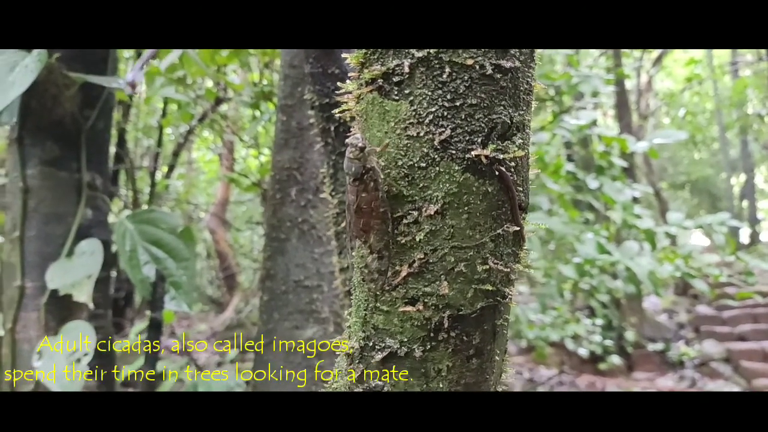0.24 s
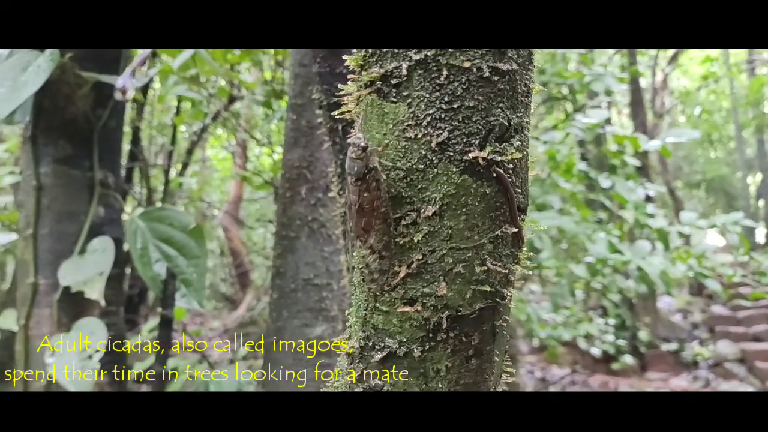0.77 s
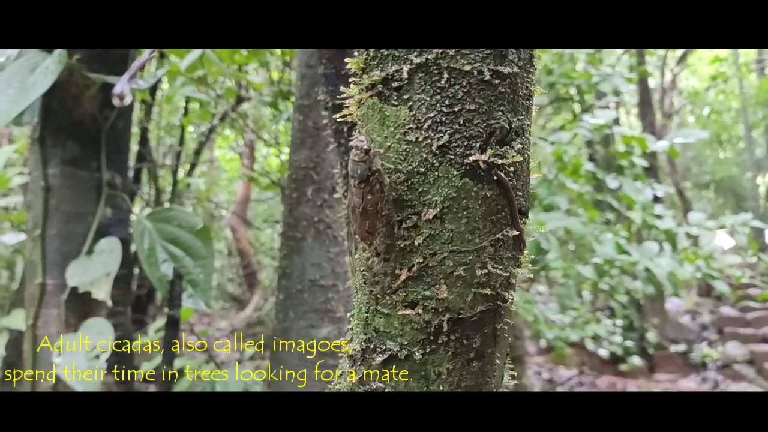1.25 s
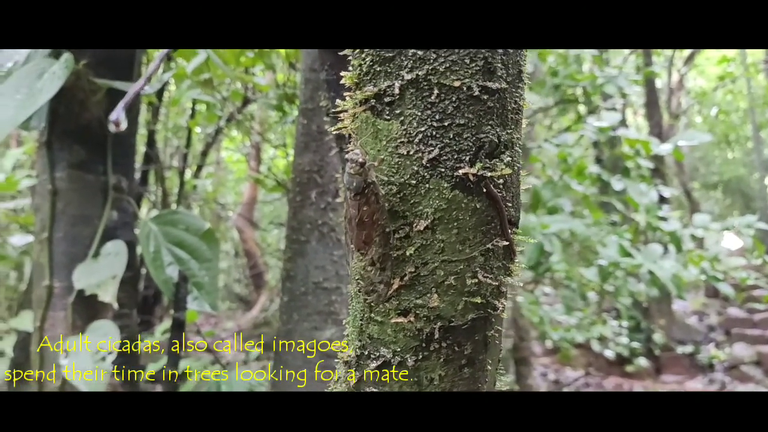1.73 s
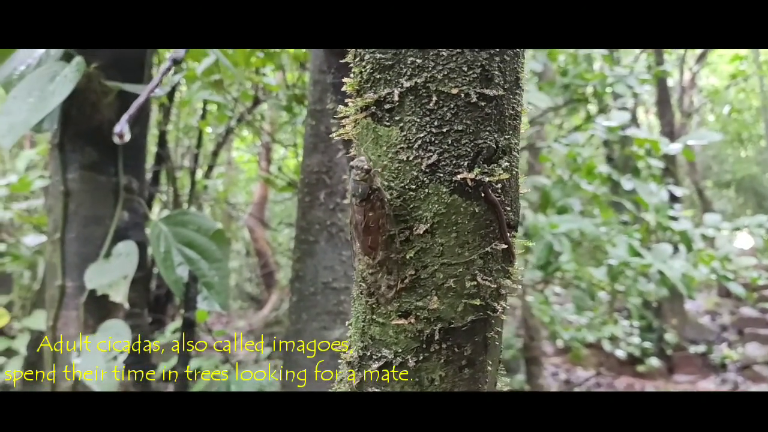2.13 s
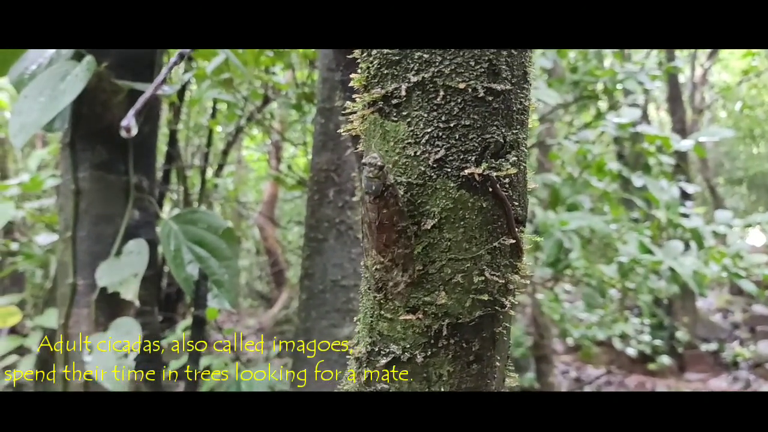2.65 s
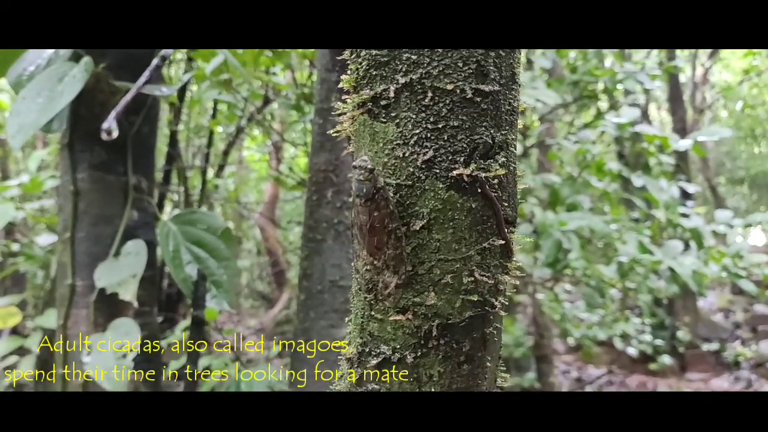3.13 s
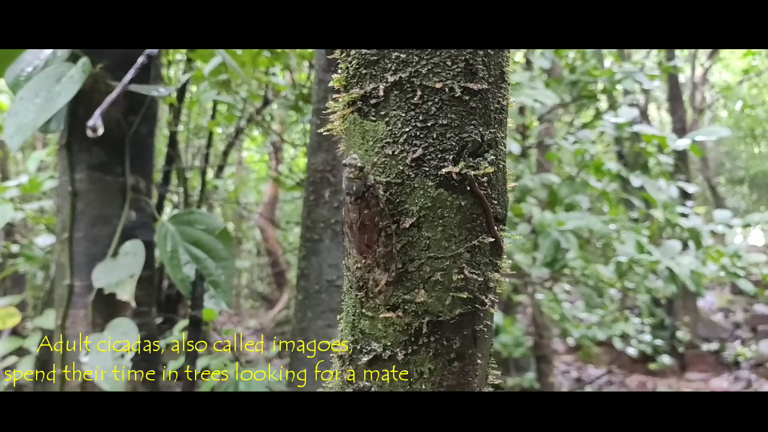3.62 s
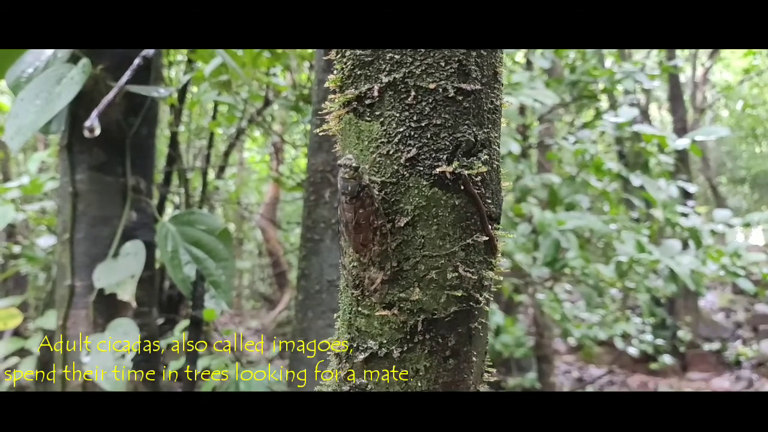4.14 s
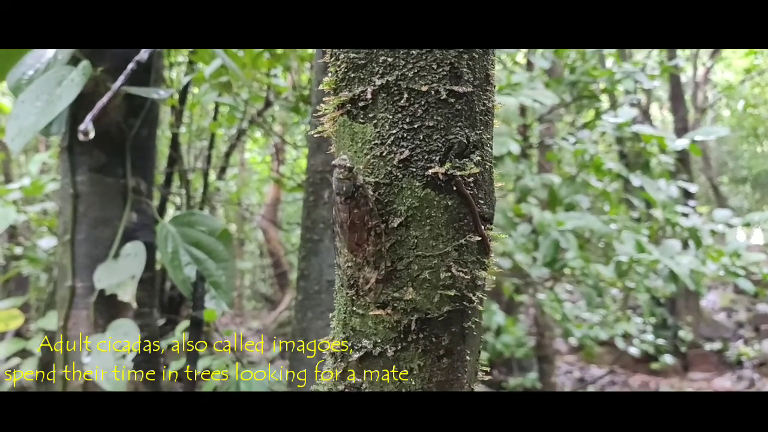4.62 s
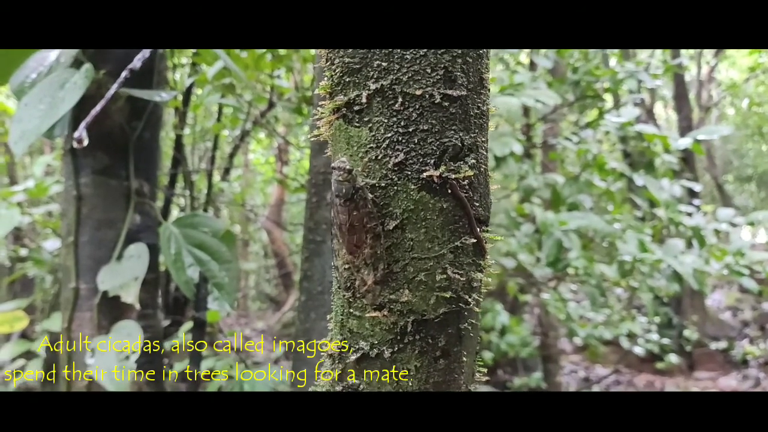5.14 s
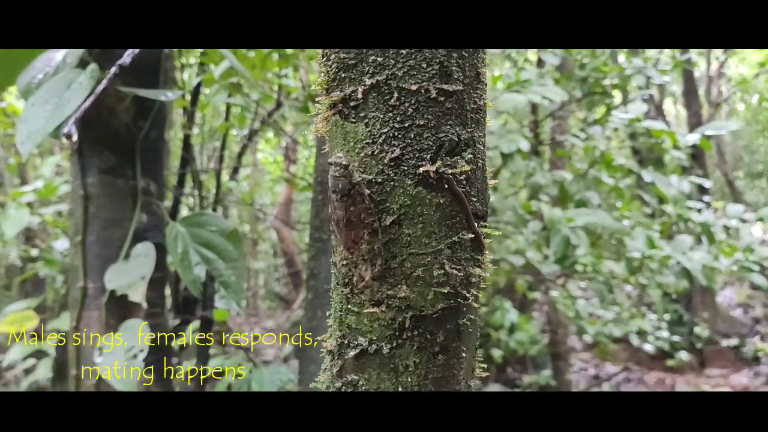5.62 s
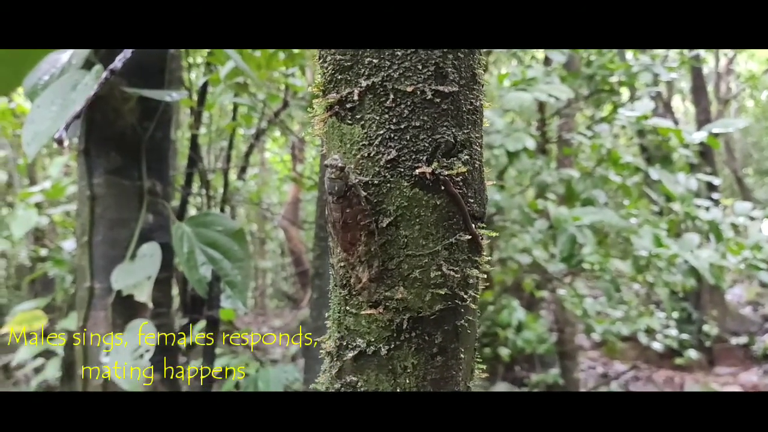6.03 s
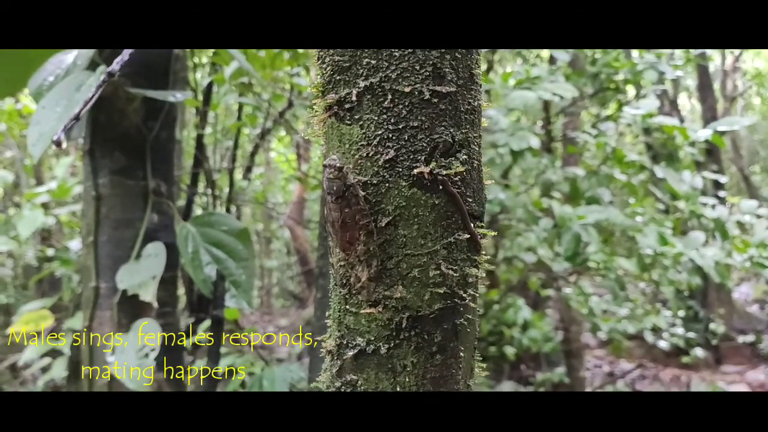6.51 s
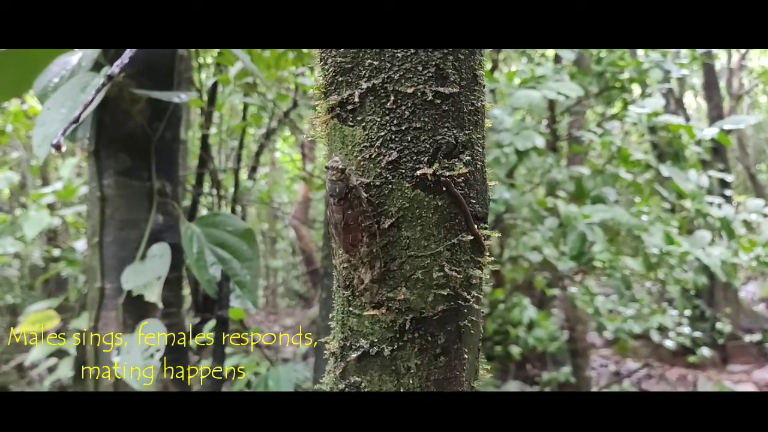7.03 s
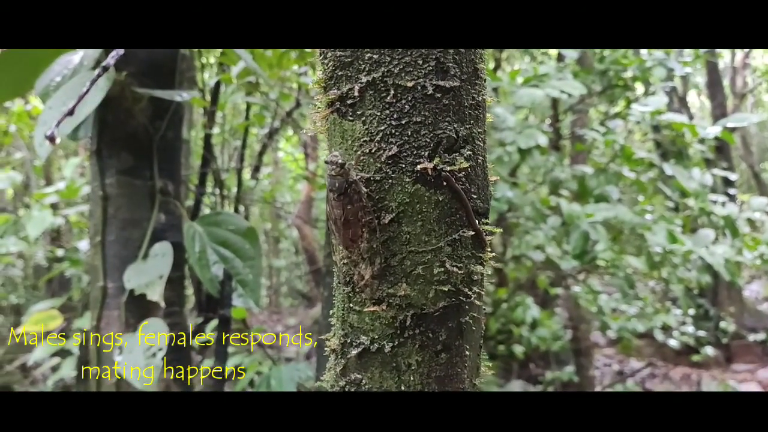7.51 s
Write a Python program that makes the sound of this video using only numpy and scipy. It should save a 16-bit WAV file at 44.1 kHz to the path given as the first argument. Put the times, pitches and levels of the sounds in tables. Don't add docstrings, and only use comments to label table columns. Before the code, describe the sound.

A single cicada close by rasps quick, dry chirps that build to a loud buzzing swell, then sag into a drone, about once a second.

```python
import sys
import numpy as np
from scipy import signal
from scipy.fft import irfft
from scipy.io import wavfile
from scipy.ndimage import uniform_filter1d

SR = 44100
rng = np.random.default_rng(int(sys.argv[2]) if len(sys.argv) > 2 else 0)


def to_wav(s):
    ch = np.atleast_2d(s).T
    pcm = np.round(np.clip(ch, -1, 1) * 32767)
    wavfile.write(sys.argv[1], SR, pcm.astype(np.int16))


def nominal_scale(level):
    x = np.asarray(level, float) / 20
    return 10 ** x


N = 342657

# (start [s], end [s])
ONE_SIDED = [(.745, 1.01), (1.71, 1.96), (2.6, 2.89), (3.62, 3.89), (4.58, 4.85), (5.57, 5.81),
             (6.59, 6.83), (7.49, 7.68)]
# (peak of effort [s], peak re usual [dB], abdomen flips down [s],
# lift of the air sac pitch [ratio], rattle re usual [dB])
SONG_PHRASES = [(0.686, -1.5, 0.695, 1.01, -1), (1.625, 0.5, 1.65, 0.93, -1),
                (2.551, 0.5, 2.56, 1.04, -1.5), (3.54, -2, 3.52, 0.9, -0.5), (4.504, -4, 4.485, 0.68, 1),
                (5.485, 0.5, 5.465, 0.76, 1), (6.505, 1, 6.485, 0.72, 1.5), (7.4, -6, 7.388, 0.6, 2.5),
                (8.3, 0, 8.28, 1, 4)]
# (frequency [Hz], level [dB])
MICROPHONE_EDGE = [(15650, 0), (15900, -24), (16700, -42), (17000, -90)]


def evened(x):
    return x / np.sqrt(np.mean(x ** 2) + 1e-20)


def read(points, hz):
    f, value = np.transpose(points)
    return np.interp(np.log(hz + 1), np.log(f + 1), value)


def ring(x, hz, width):
    turn = np.exp(2j * np.pi * np.cumsum(hz * np.ones(len(x))) / SR)
    r = np.exp(-np.pi * width / SR)
    return np.sqrt(2 * (1 - r * r)) * (turn * signal.lfilter([1], [1, -r], x / turn)).imag


def steep(x, hz, width):
    return ring(ring(x, hz, width), hz, 3 * width) * np.sqrt(6 * np.pi * width / SR)


def colour(x, points):
    log_gain = np.log(nominal_scale(read(points, abs(np.fft.fftfreq(4096, 1 / SR)))))
    taps = np.fft.ifft(np.exp(np.conj(signal.hilbert(log_gain)))).real[:1024]
    return signal.oaconvolve(x, taps)[:N]


def forest():
    # (frequency [Hz], density [dB per Hz])
    forest_spectrum = [(20, 13.5), (45, 0.5), (100, -2.5), (250, -9), (500, -14.5), (1200, -21),
                       (2600, -19.5), (3800, -20.5), (5000, -22.5), (6600, -29), (8000, -22.5),
                       (12000, -29), (16000, -43)]
    # (frequency [Hz], left-right likeness [0-1])
    likeness = [(30, 0.89), (150, 1), (300, 0.82), (700, 0.49), (3000, 0.021)]
    frames, hz = N // 256 + 5, np.fft.rfftfreq(1024, 1 / SR)
    a, b, c, d, patches = rng.standard_normal((frames, 513, 5)).T
    patches = uniform_filter1d(patches, size=10, axis=0)
    patches = evened(uniform_filter1d(patches, size=12, axis=1))
    same = np.clip(read(likeness, hz), -1, 1)[:, None]
    left = a + 1j * b
    z = np.array([left, same * left + np.sqrt(1 - same ** 2) * (c + 1j * d)])
    z *= nominal_scale((read(forest_spectrum, hz) + read(MICROPHONE_EDGE, hz))[:, None] + 1.6 * patches)
    return nominal_scale(-51) * evened(signal.istft(z, nperseg=1024, noverlap=768)[1][:, :N])


def far_insects():
    throb = 1 + 0.19 * np.sin(2 * np.pi * 31 * np.arange(N) / SR)
    whistle = [evened(ring(ring(rng.standard_normal(N), 5800, 550), 5800, 550)) for _ in range(2)]
    return nominal_scale(np.array([[-64], [-69]])) * throb * whistle


def leaves(x, t60, start_ms):
    t = np.arange(8000) / SR
    taps = rng.choice([-1., 1.], (2, len(t))) * (rng.random((2, len(t))) < .08)
    taps *= nominal_scale(-60 * t / t60) * (t > start_ms / 1000)
    return signal.oaconvolve(x, taps / np.linalg.norm(taps, axis=1, keepdims=True), axes=1)[:, :N]


def ports(x):
    # (frequency [Hz], left minus right [dB])
    shading = [(700, 3), (1300, 0), (1700, -3.5), (2150, -6.5), (2600, 1.5), (3400, -3), (4300, 0.5),
               (5000, 4), (5500, 10.5), (6000, 15), (6600, -4.5), (9000, 2), (9700, -0.5), (13500, 0)]
    # (frequency [Hz], phase by which the left leads [rad])
    left_lead = [(100, 0), (800, -1.7), (1500, -1), (2200, -.3), (2900, -1.3), (4100, -1.2), (5200, -2.4),
                 (6100, -4.3), (7500, -4.2), (9000, -6), (12000, -8), (16000, -10.5)]
    hz = np.fft.rfftfreq(1024, 1 / SR)
    lead = np.exp(1j * np.interp(hz, *np.transpose(left_lead)))
    shade = nominal_scale(read(shading, hz))
    right = np.sqrt(2 / (1 + shade ** 2)) * nominal_scale(read(MICROPHONE_EDGE, hz))
    taps = np.roll(irfft(np.array([shade * right * lead, right])), 512, axis=1) * np.hanning(1024)
    return signal.oaconvolve(x, taps, axes=1)[:, 512:512 + N]


def bursts():
    # (first chirp [s], last chirp [s], chirp length [s], extra effort [dB])
    chirp_runs = [(.004, .055, 0.016, -4), (0.226, .341, 0.02, 1), (0.403, .517, 0.024, 0.5),
                  (1.037, 1.037, 0.018, -3.4), (1.189, 1.465, 0.022, 0.15), (1.989, 2.04, 0.025, -2.5),
                  (2.1, 2.27, .023, -0.8), (2.328, 2.384, 0.03, -0.5), (2.909, 3.001, 0.019, -3),
                  (3.062, 3.123, 0.024, -1.5), (3.175, 3.283, 0.023, 0.4), (3.34, 3.395, 0.027, 0.5),
                  (3.912, 4.081, 0.019, -2), (4.146, 4.2, 0.019, 0), (4.258, 4.369, 0.025, -1),
                  (4.879, 4.934, 0.021, -1), (4.993, 5.231, .026, 0.5), (5.289, 5.289, 0.021, 2.3),
                  (5.344, 5.345, 0.024, 3.2), (5.844, 5.898, 0.022, -2), (5.937, 5.938, 0.038, -2),
                  (6.011, 6.188, 0.025, 0), (6.242, 6.351, 0.025, 0.6), (6.867, 7.272, 0.024, -0.5),
                  (7.698, 7.753, 0.024, -0.3)]
    # (first click [s], last click [s], extra effort [dB])
    swells = [(0.104, 0.191, -2), (.568, 0.608, 1.3), (0.626, 0.723, 0.9), (1.088, 1.158, -4),
              (1.517, 1.557, -1), (1.569, 1.628, -2), (1.653, 1.689, -0.5), (2.442, 2.477, -0.1),
              (2.492, 2.564, -1.2), (3.45, 3.604, 0.9), (4.427, 4.475, -2), (4.494, 4.654, -3),
              (5.398, 5.548, 0.36), (6.406, 6.449, -.2), (6.464, 6.573, -1.5), (7.326, 7.374, -2),
              (7.394, 7.473, 1)]
    # (first click [s], last click [s], extra effort [dB])
    drones = [(.748, .846, -6), (0.87, .997, -5), (1.712, 1.822, -3.6), (1.826, 1.941, -3.5),
              (2.575, 2.707, -5), (2.738, 2.879, -4), (3.624, 3.676, -2.7), (3.699, 3.873, -3),
              (4.675, 4.708, -3.5), (4.722, 4.833, -1.5), (5.574, 5.804, -2), (6.591, 6.732, -0.5),
              (6.737, 6.824, -1.5), (7.496, 7.665, -0.5)]
    short = []
    for first, last, length, db in chirp_runs:
        count = round((last - first) / .056) + 1
        short += [(s, s + length, db) for s in np.linspace(first, last, count)]
    return short + swells + drones


def effort(t):
    # (time from peak [s], effort [dB])
    effort_shape = [(-.53, -43), (-.15, -41), (-.09, -35), (-.04, -30), (0, -24), (.04, -30), (.09, -36.5),
                    (.18, -44.5), (0.268, -44.5)]
    s, db = np.transpose(effort_shape)
    peak_from_db = -38
    share = np.clip((db - peak_from_db) / (db.max() - peak_from_db), 0, 1)
    rows = []
    for peak, peak_db, *_ in SONG_PHRASES:
        rows += zip(peak + s, db + share * peak_db)
    return np.interp(t, *np.transpose(sorted(rows)))


def posture(t):
    # (time from flip [s], air sac [Hz], tymbal plate [Hz], plate re sac [dB], rattle re sac [dB])
    posture_shape = [(-.52, 2034, 4700, 0, -3.5), (-.31, 2450, 4530, -1.5, -5), (-.12, 2950, 4580, 1, -4.5),
                     (-.035, 2890, 4250, -0.5, 1), (0, 2690, 4770, 3.5, -4.5), (0.036, 2380, 5020, 6, -2.5),
                     (0.102, 2080, 4400, 0.5, -6.5), (.19, 1890, 4774, 3, -3.5),
                     (.27, 1810, 5200, 2.5, -2.5)]
    rest_hz = 2000
    rows = []
    for _, _, flip, lift, more_db in SONG_PHRASES:
        for s, sac_hz, plate_hz, plate_db, rattle_db in posture_shape:
            lifted_hz = rest_hz + lift * (sac_hz - rest_hz)
            rows.append((flip + s, lifted_hz, plate_hz, plate_db, rattle_db + more_db))
    s, *columns = np.transpose(sorted(rows))
    return [np.interp(t, s, c) for c in columns]


def muscles(pair_ms, offset, snap_ms, jitter_ms, spread_db, second_db, lone):
    # (effort [dB], period [ms])
    muscle_pace = [(-44, 11.3), (-39, 10), (-35, 8)]
    inward, outward = np.zeros((2, N + SR))
    work = bursts()
    chance = rng.standard_normal((len(work), 60, 5))
    times = np.arange(0, N / SR + 1, .002)
    effort_db = effort(times)
    for (start, end, extra_db), draws in zip(work, chance):
        s = start
        for draw in draws:
            period = np.interp(np.interp(s, times, effort_db), *np.transpose(muscle_pace)) / 1000
            both = not any(a < s < b for a, b in ONE_SIDED)
            slack = np.clip((period - .008) / .003, 0, 1)
            period += both * slack * pair_ms / 1000
            uneven_db = spread_db * (1.0 + slack * (0.5 + lone * (not both))) * draw[:4]
            size = nominal_scale(extra_db + uneven_db + 1.73 * (s == start))
            size = size * np.sqrt(period * SR / (1 + both))
            partner = s + period * (.5 + slack * offset)
            for side, at in enumerate([s, partner][:1 + both]):
                if at < end + .001:
                    gain = nominal_scale(second_db * side)
                    inward[round(at * SR)] += gain * size[side]
                    back = at + min(snap_ms / 1000, period / 2)
                    outward[round(back * SR)] += gain * size[2 + side] * (back < end + .003)
            s += period + draw[4] * jitter_ms / 1000 * (.33 + slack * (1 + lone * (not both)))
            if s > end:
                break
    return inward[:N], outward[:N]


def crunch(train, ms, rough):
    fall = np.exp(-np.arange(300) / (ms * SR / 1000))
    scratch = signal.oaconvolve(train, fall / np.linalg.norm(fall))[:N] * rng.standard_normal(N)
    rough = np.clip(rough, 0, 1)
    return np.sqrt(1 - rough) * train + np.sqrt(rough) * scratch


def air_sac(inward, outward, push, sac_hz, tense, resting):
    # (frequency [Hz], level [dB])
    buzz = [(1500, -22.5), (1950, 4), (2600, -0.5), (3200, 4.5), (3750, -4), (4200, 1), (4700, 0.5),
            (5300, -7), (6500, -15)]
    raised = np.clip((sac_hz - 2050) / 500, 0, 1)
    sac = nominal_scale(-7.0 + 5.6 * tense - 10 * resting) * steep(push, sac_hz, 360)
    sac += nominal_scale(-7.5 - 5.6 * raised + 4.7 * resting) * steep(push, 2030 - 90 * resting, 135)
    slack_db = -14 + 14 * resting
    sac += nominal_scale(slack_db - 2.0) * steep(push, 1712, 164)
    sac += nominal_scale(slack_db - 8) * steep(crunch(inward + .8 * outward, ms=1.5, rough=.6), 2900, 520)
    loose = nominal_scale(-11 * tense - 14 * resting)
    crisp = crunch(inward + .77 * outward, ms=1, rough=.4)
    return sac + nominal_scale(3.5) * loose * colour(crisp, buzz)


def tymbal_plate(push, sac_hz, plate_hz, plate_db, tense, resting):
    locked_hz = plate_hz + tense * (np.minimum(2.003 * sac_hz, 4900) - plate_hz)
    plate = nominal_scale(-12.5 + 5.4 * tense + 1.1 * tense * plate_db) * steep(push, locked_hz, 300)
    return plate + nominal_scale(-12 + 4.0 * tense - 20 * resting) * steep(push, 4340, 270)


def snap_back(outward, tense, resting):
    # (frequency [Hz], level [dB])
    snap_spectrum = [(2500, -13), (4150, -41.5), (4600, 9), (5300, 3.5), (5900, 3), (6600, 3), (8000, -83),
                     (10500, -9.5), (15500, -50), (15900, -96)]
    flick = crunch(outward, ms=.35, rough=.1)
    return nominal_scale(2.0 - 10.5 * tense + 1.85 * resting) * colour(flick, snap_spectrum)


def shudder(inward, effort_db, tense):
    shake = crunch(inward, ms=1.2, rough=1)
    shake_hz = np.maximum(902 + 30 * (effort_db + 26.5), 500)
    return nominal_scale(-36.5 + 14.9 * tense) * (steep(shake, shake_hz, 280) + nominal_scale(-7) * steep(shake, 682, 230))


def rib_rattle(inward, outward, tense):
    # (frequency [Hz], level [dB])
    rib_spectrum = [(3000, -13), (4500, 1), (5500, -5), (6800, -1), (7550, 0.5), (8000, -3.5), (8600, -7),
                    (9200, -10.5), (10500, -9), (12000, -13), (13200, -8), (14300, -12.5), (15600, -15),
                    (15900, 6)]
    shared = crunch(inward + .5 * outward, ms=1.0, rough=1.0)
    ribs = []
    for _ in range(2):
        own = crunch(inward, ms=2.0, rough=1.0)
        ribs.append(colour(shared + 1.39 * own, rib_spectrum))
    long_rib = nominal_scale(-20.5 + 12.6 * tense) * steep(shared, 7450, 380)
    return long_rib + nominal_scale(1.0 - 0.5 * tense) * np.array(ribs)


def cicada():
    # (frequency [Hz], level [dB])
    small_body = [(700, -45), (1250, -30), (1550, -8), (1850, 0), (16000, 0)]
    t = np.arange(N) / SR
    effort_db, (sac_hz, plate_hz, plate_db, rattle_db) = effort(t), posture(t)
    inward, outward = muscles(pair_ms=1.2, offset=.11, snap_ms=4.8, jitter_ms=.5,
                              spread_db=.9, second_db=-3.6, lone=.15)
    tense = np.clip((effort_db + 38) / 8, 0, 1)
    resting = sum(np.clip((t - a) / 0.099, 0, 1) * (t < b) for a, b in ONE_SIDED)
    push = crunch(inward + .2 * outward, ms=.5, rough=.15)
    sac = air_sac(inward, outward, push, sac_hz, tense, resting)
    plate = tymbal_plate(push, sac_hz, plate_hz, plate_db, tense, resting)
    voice = colour(sac + nominal_scale(plate_db) * plate, small_body)
    beam_db = np.array([[1.5], [-4]])
    voice = voice + nominal_scale(plate_db + beam_db) * snap_back(outward, tense, resting)
    body = shudder(inward, effort_db, tense)
    return nominal_scale(effort_db) * (voice + body + nominal_scale(rattle_db) * rib_rattle(inward, outward, tense))


def scene():
    near = ports(cicada())
    bark = nominal_scale(-7) * leaves(near, t60=.02, start_ms=.6)
    foliage = nominal_scale(-10.5) * leaves(near, t60=0.065, start_ms=3)
    return near + bark + foliage + forest() + far_insects()


def low_pass(x):
    return signal.sosfilt(signal.butter(12, 16650, fs=SR, output="sos"), x)


def record(dry):
    return low_pass(dry)


dry = scene()
out = record(dry)
to_wav(out)
```